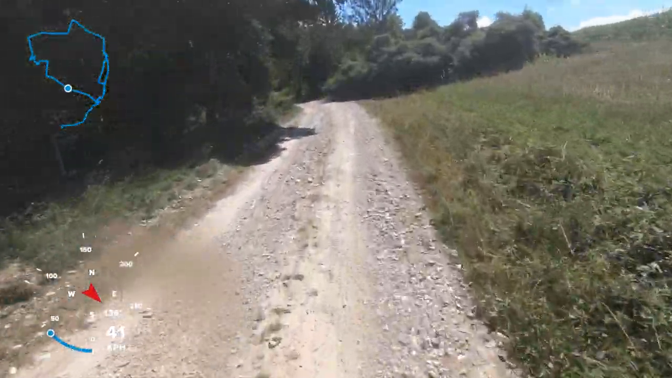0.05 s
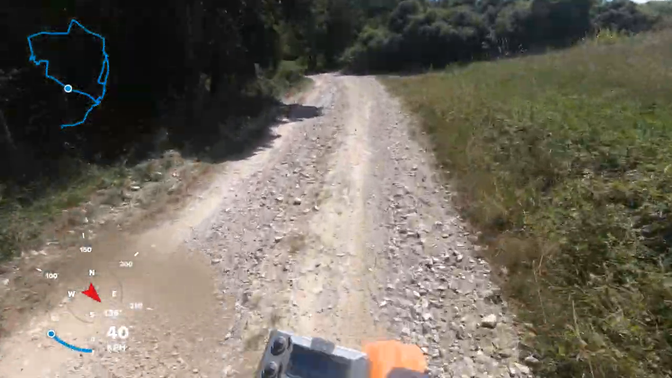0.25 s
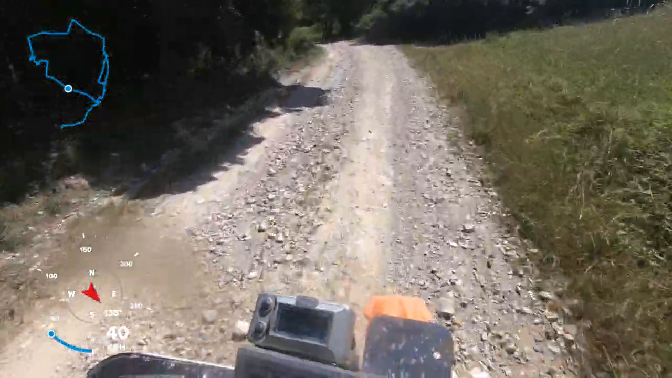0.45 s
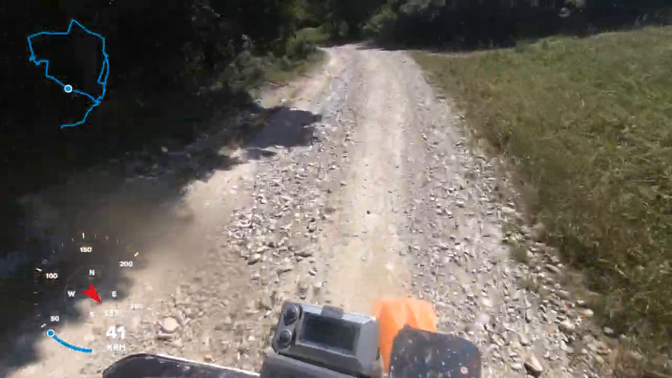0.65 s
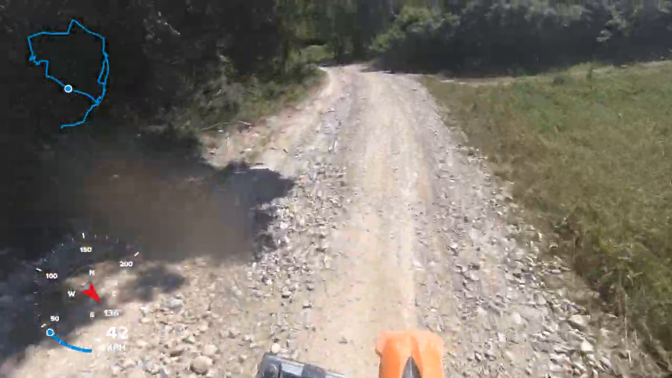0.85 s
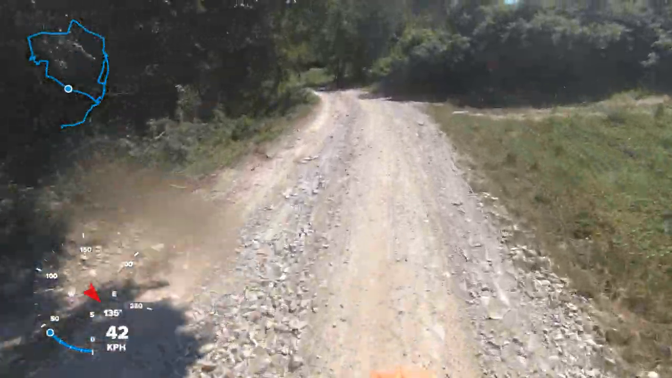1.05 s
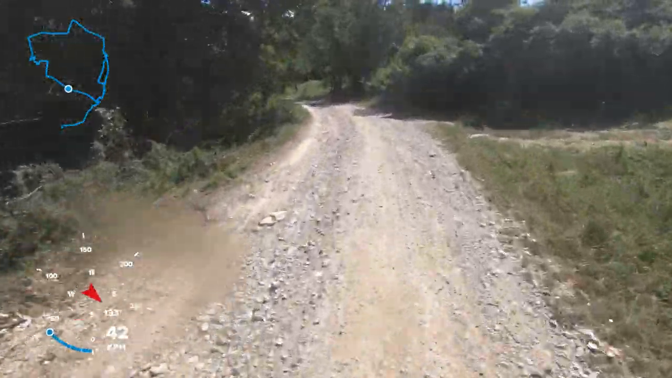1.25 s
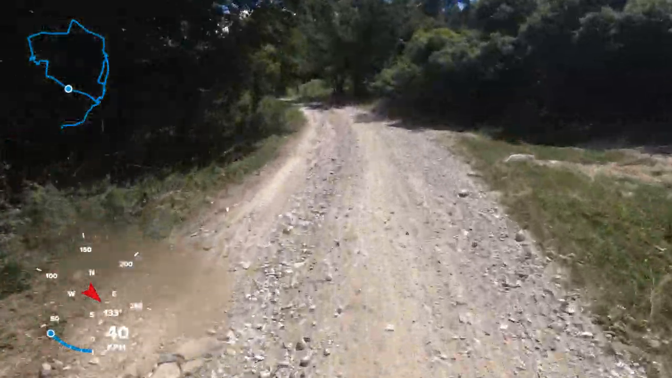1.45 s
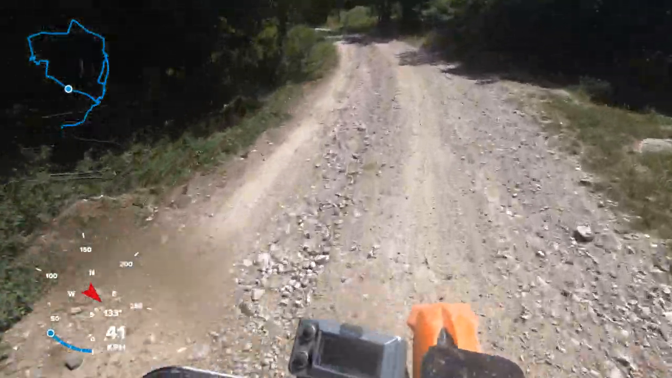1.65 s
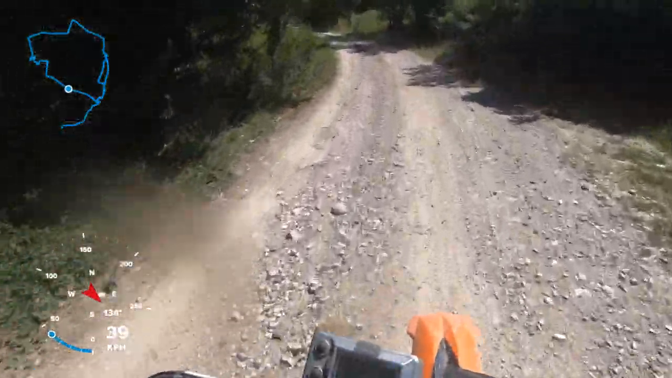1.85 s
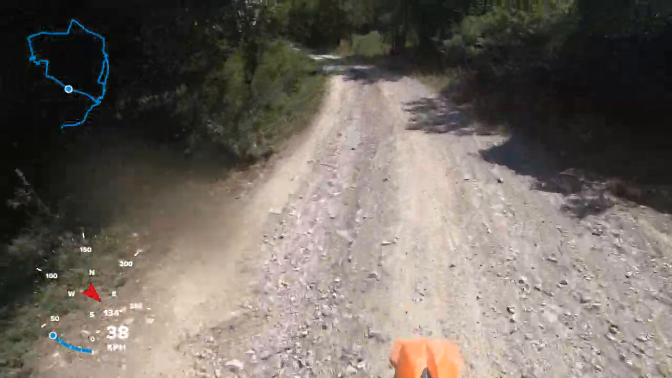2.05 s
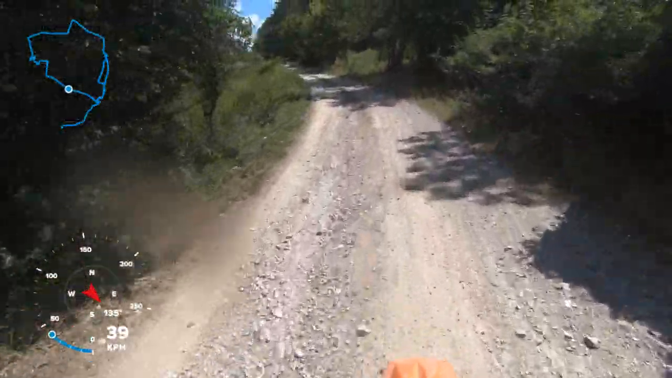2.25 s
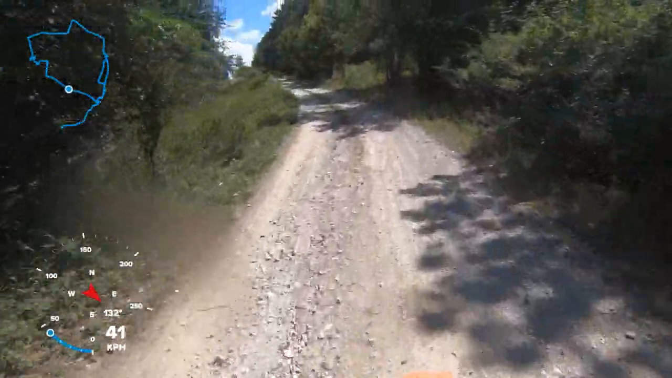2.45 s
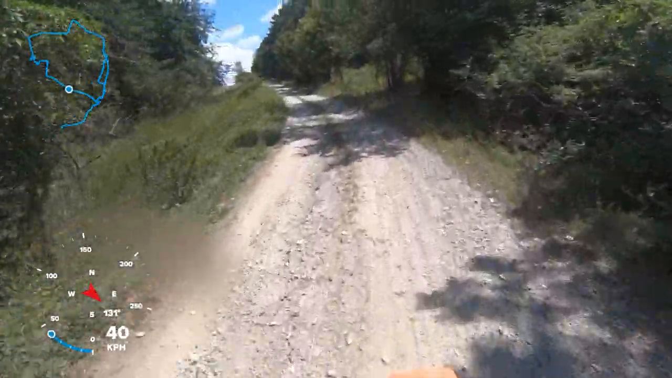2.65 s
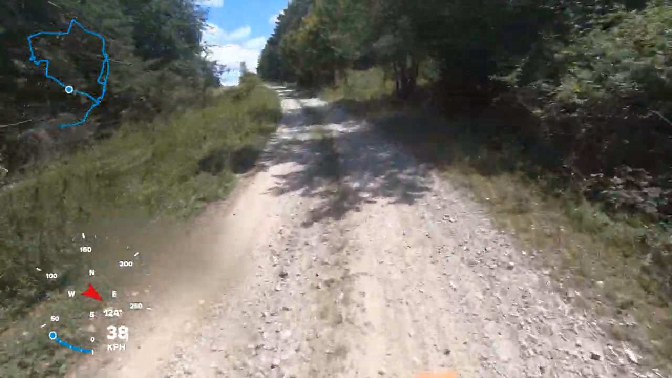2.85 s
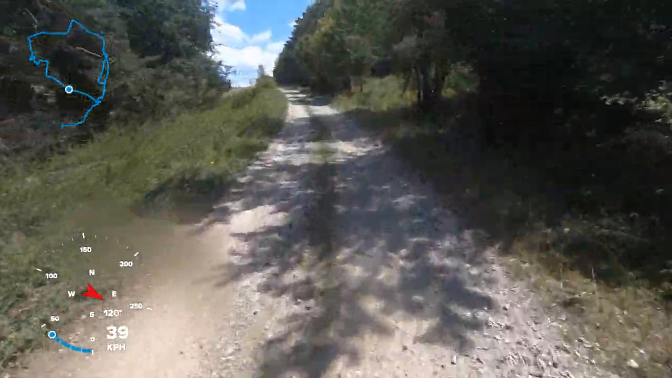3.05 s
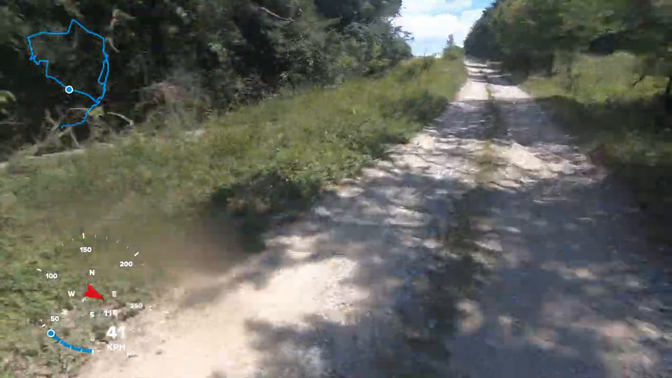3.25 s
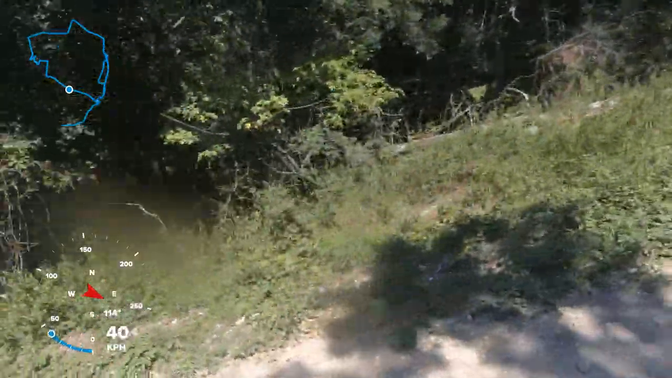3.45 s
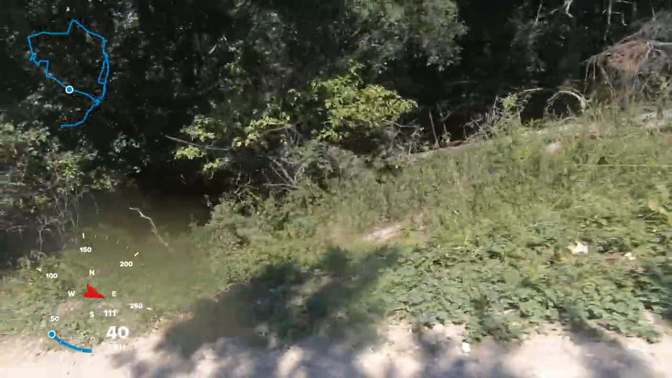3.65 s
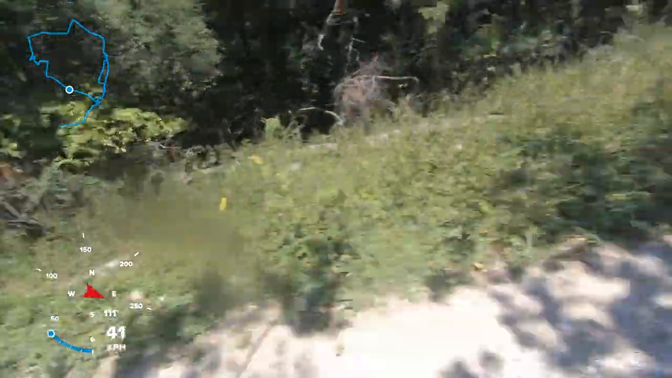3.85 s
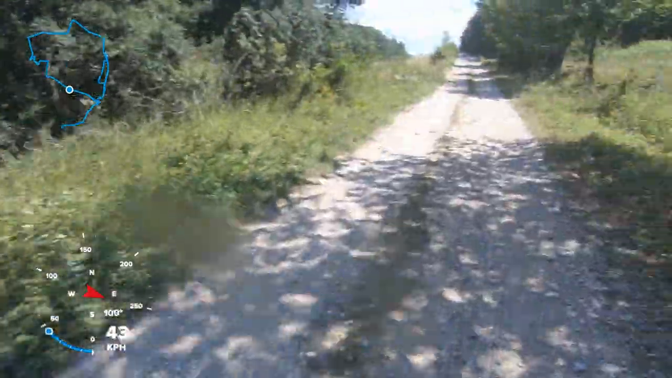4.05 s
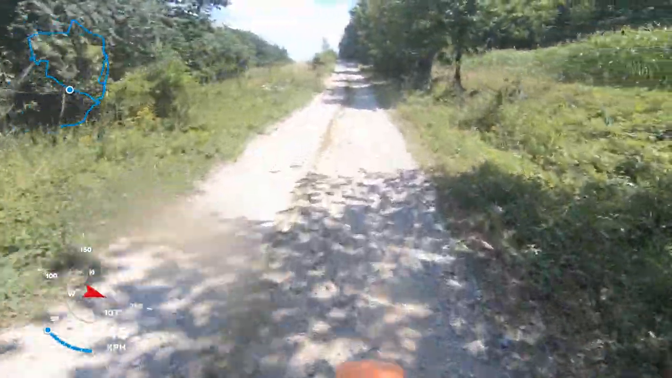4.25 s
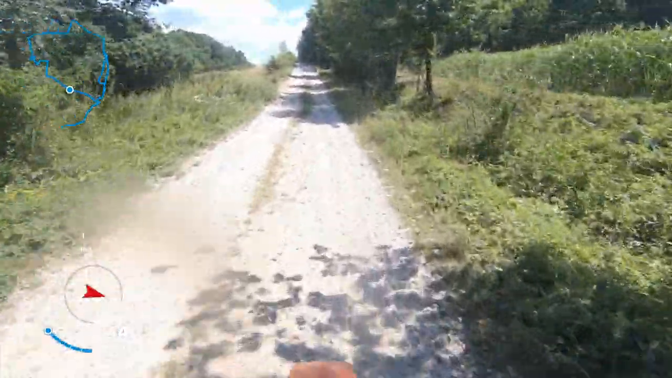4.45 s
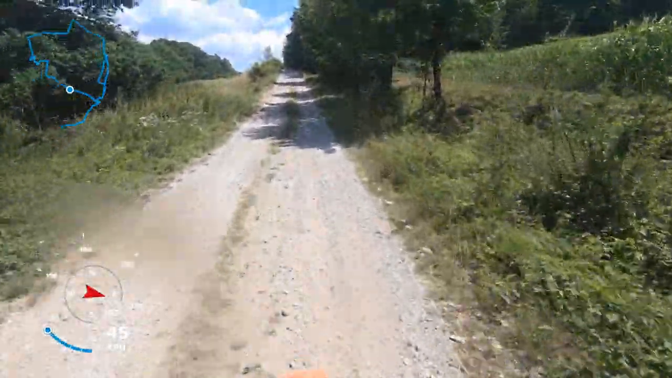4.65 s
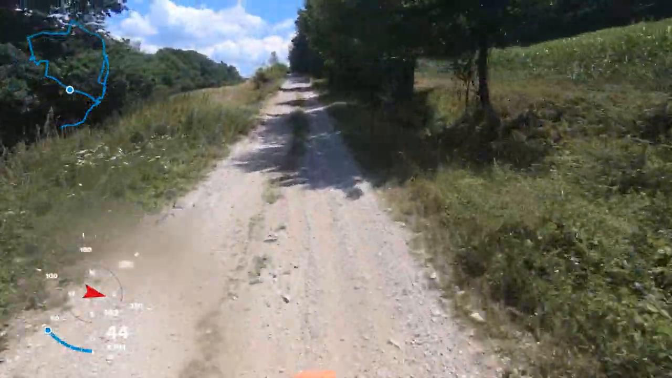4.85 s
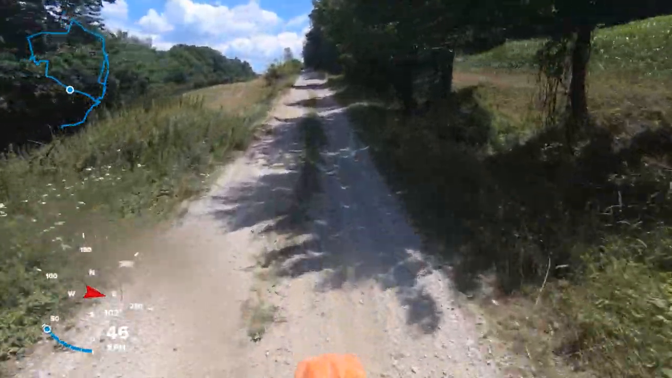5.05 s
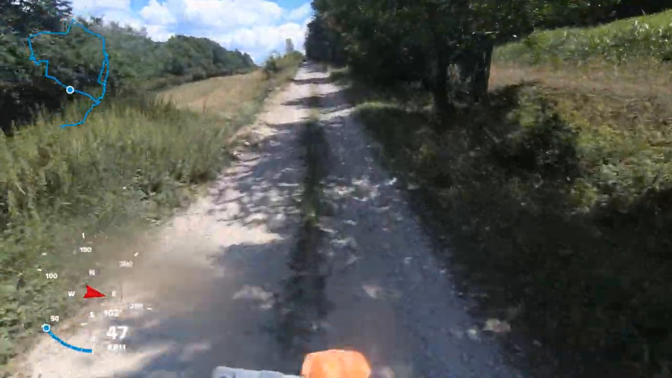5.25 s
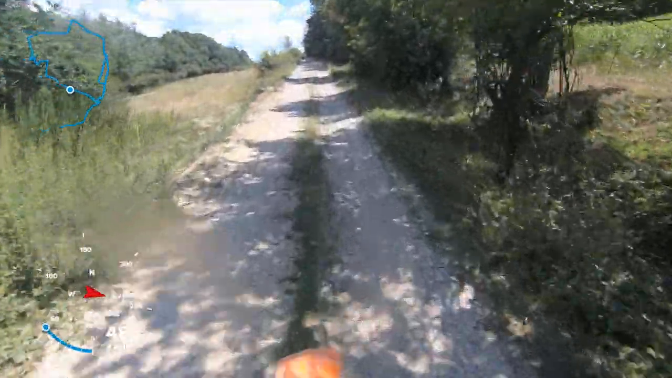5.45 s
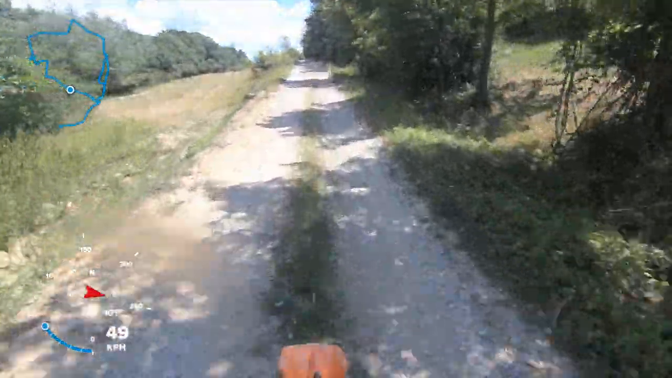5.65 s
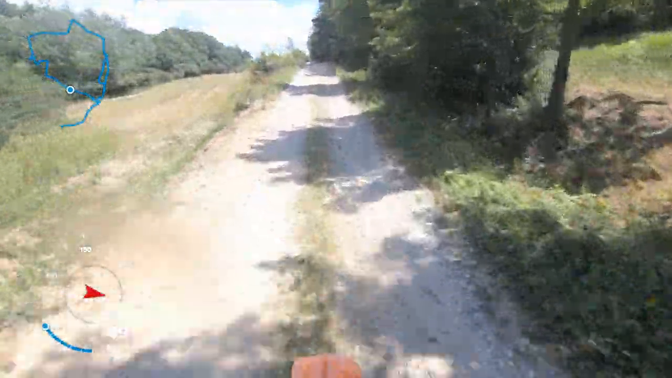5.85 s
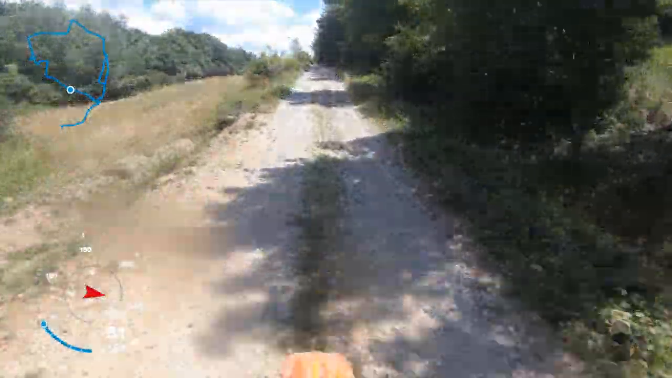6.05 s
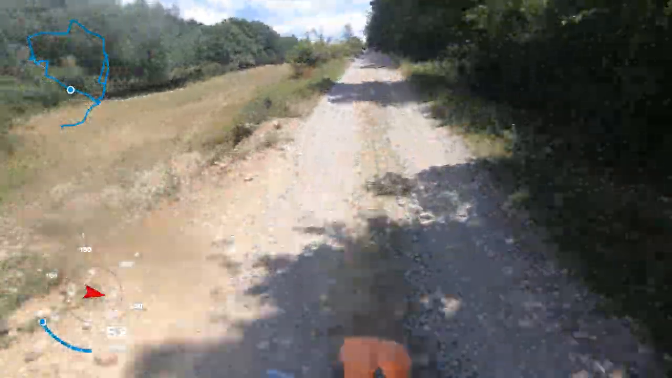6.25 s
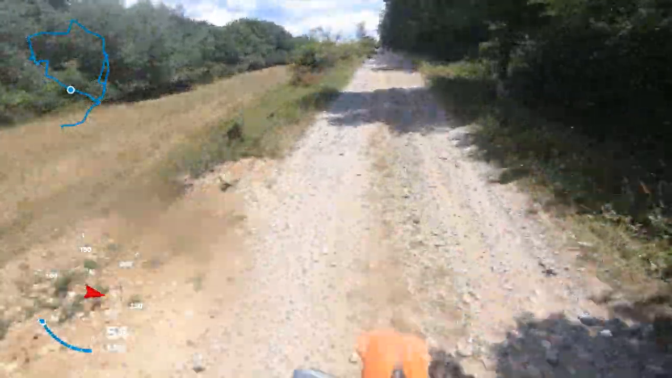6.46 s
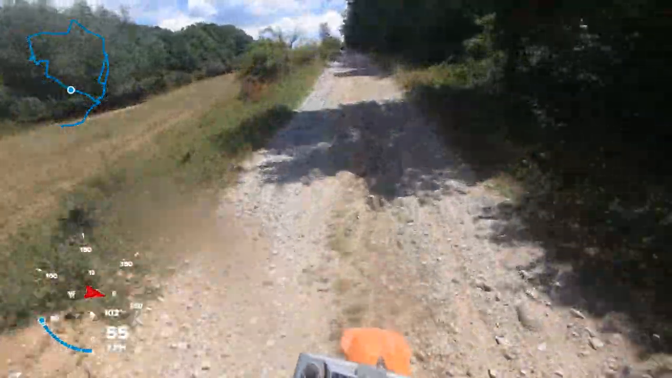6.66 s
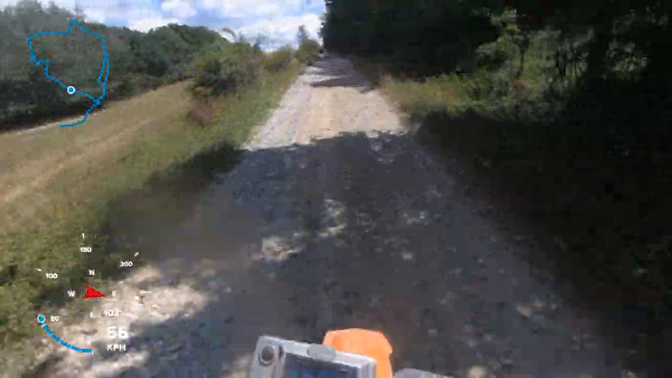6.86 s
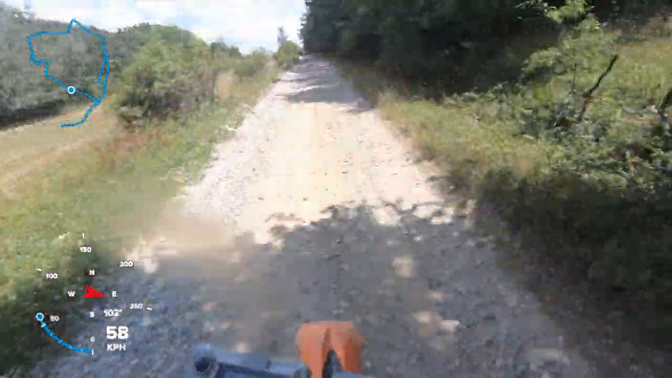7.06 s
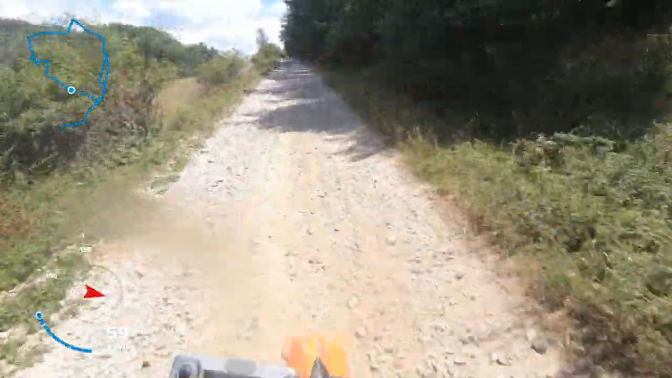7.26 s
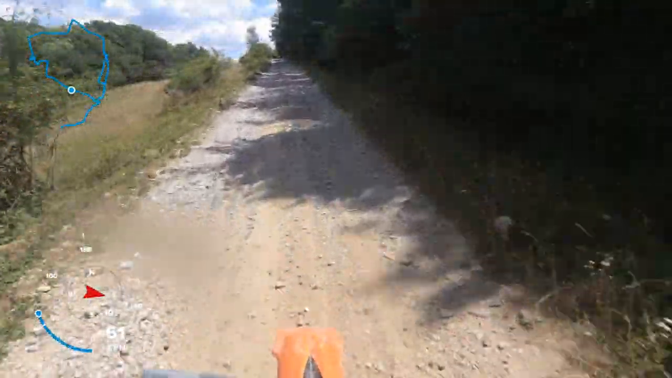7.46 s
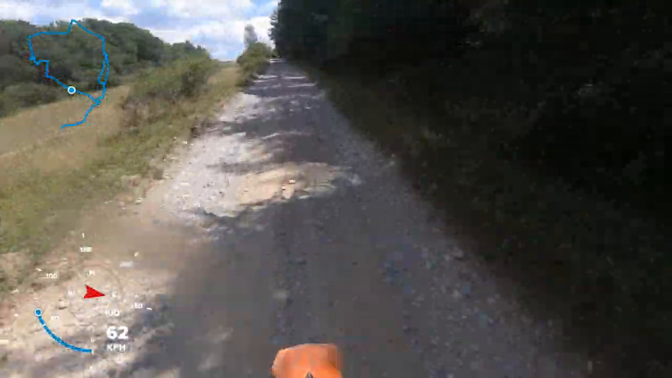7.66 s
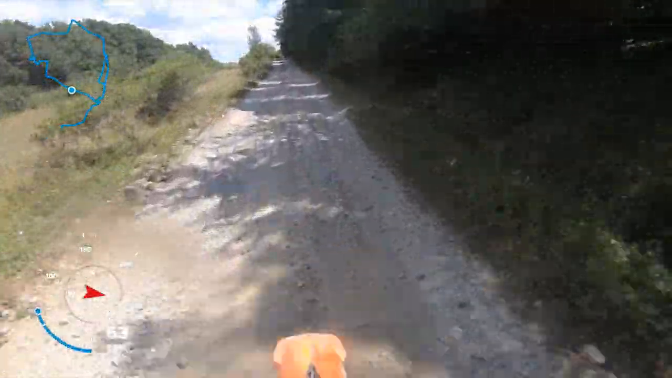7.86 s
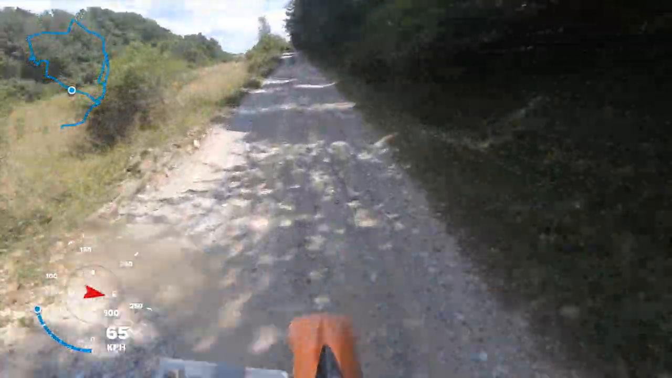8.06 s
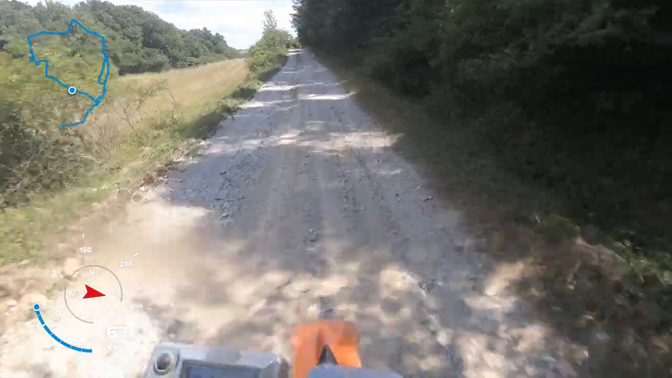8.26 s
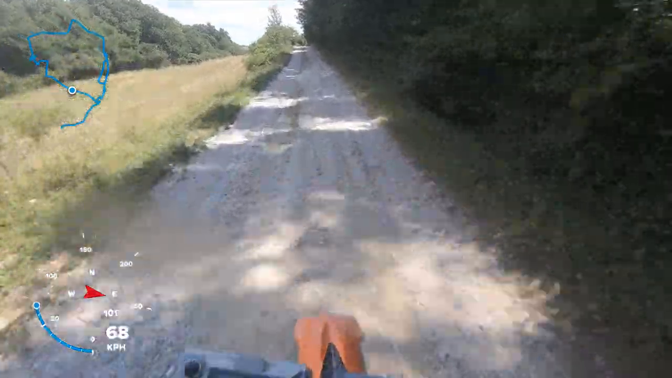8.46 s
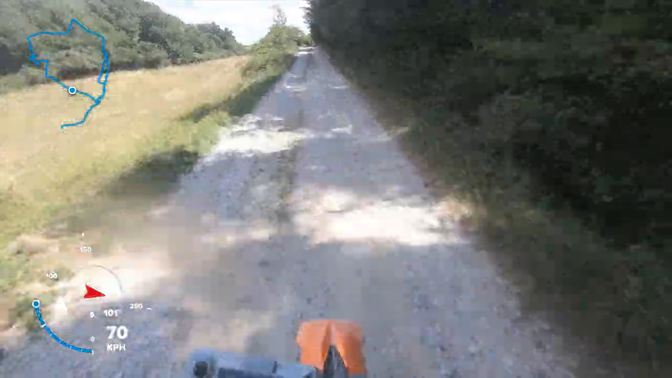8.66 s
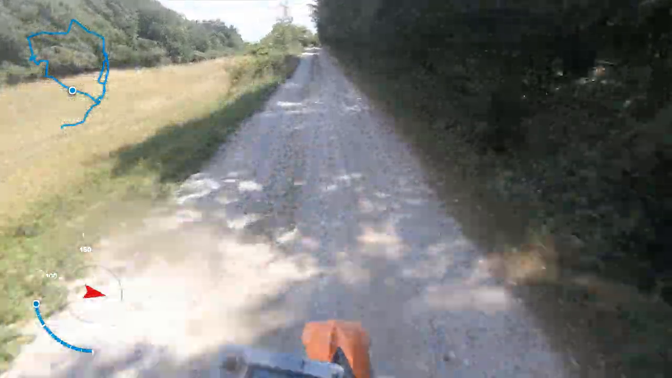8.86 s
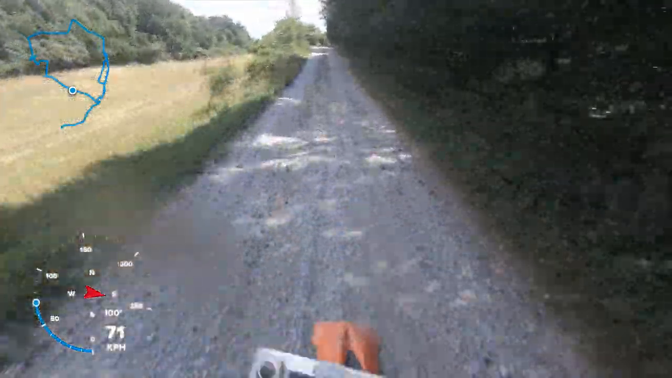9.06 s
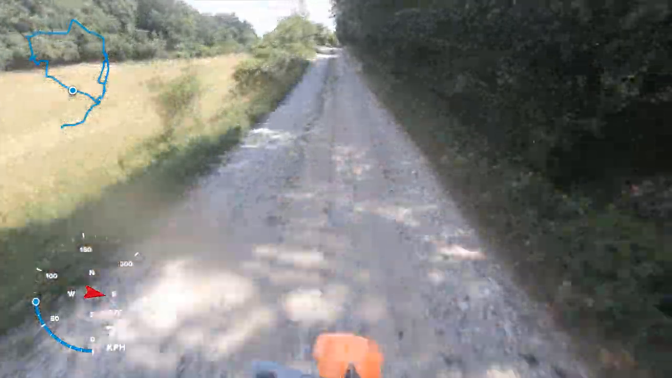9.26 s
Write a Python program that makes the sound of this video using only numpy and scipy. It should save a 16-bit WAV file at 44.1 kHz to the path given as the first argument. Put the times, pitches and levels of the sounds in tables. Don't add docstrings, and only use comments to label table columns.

```python
import sys
import numpy as np
from scipy import signal
from scipy.fft import rfft, irfft, next_fast_len
from scipy.io import wavfile

SR = 44100
rng = np.random.default_rng(int(sys.argv[2]) if len(sys.argv) > 2 else 0)


def linear_from_db(decibels):
    return 10 ** (np.asarray(decibels, float) / 20)


def wrap_up_sound(samples):
    columns = np.atleast_2d(samples).T
    tamed = np.clip(columns, -1, 1)
    steps = np.round(tamed * 32767).astype(np.int16)
    wavfile.write(sys.argv[1], SR, steps)


N = 410571
SIZE = next_fast_len(N + SR)
HZ = np.maximum(np.arange(SIZE // 2 + 1) * SR / SIZE, 1)
SWELL_EDGE_S, GUST_EDGE_S, ENGINE_EDGE_S = 0.06, 0.0091, 0.026


def rms_one(x):
    return x / np.sqrt(np.mean(x ** 2) + 1e-20)


def in_time(rows):
    s, *columns = np.transpose(rows)
    return [np.interp(np.arange(N) / SR, s, column) for column in columns]


def at_hz(points):
    hz, value = np.transpose(points)
    return np.interp(np.log(HZ), np.log(np.maximum(hz, 1)), value)


def response(points, hz):
    return np.interp(hz, *np.transpose(points))


def drift(rate):
    r = np.exp(-80 * np.pi * rate / SR)
    slow = signal.lfilter([1], [1, -2 * r, r * r], rng.standard_normal(N // 40 + 2002))[2000:]
    return np.interp(np.arange(N) / 40, np.arange(len(slow)), rms_one(slow))


def swell(start_s, length_s, edge_s):
    hold_s = max(length_s, 2 * edge_s)
    corners_s = [-edge_s, edge_s, hold_s - edge_s, hold_s + edge_s]
    return np.interp(np.arange(N) / SR - start_s, corners_s, [0, 1, 1, 0])


def changes(events, edge_s):
    return sum(amount * swell(start_s, length_s, edge_s) for start_s, length_s, amount in events)


def lowpass(x, order, hz):
    return signal.sosfilt(signal.butter(order, hz, fs=SR, output="sos"), x)


def resonate(x, hz, width_hz):
    r = np.exp(-np.pi * width_hz / SR)
    return signal.lfilter(np.array([1, 0, -1]) * (1 - r * r) / 2, [1, -2 * r * np.cos(2 * np.pi * hz / SR), r * r], x)


# pitch_hz, common_share
PORT_LIKENESS = [(40, 0.88), (120, 0.99), (250, 0.48), (500, 0.65), (1000, 0.41), (2000, 0.52),
                 (4000, 0.71), (8000, 0.18), (14000, .2)]


def noise(spectrum, patchy_db, rate):
    shared, left, right = rfft(rng.standard_normal((3, SIZE)))
    alike = np.clip(at_hz(PORT_LIKENESS), 0, 1)
    pair = linear_from_db(at_hz(spectrum)) * (np.sqrt(alike) * shared + np.sqrt(1 - alike) * np.array([left, right]))
    centres = np.arange(np.round(np.log2(spectrum[1][0])), np.log2(spectrum[-2][0]) + .5)
    octave = np.clip(np.log2(HZ), centres[0], centres[-1])
    out, together = 0, drift(rate)
    for centre in centres:
        band = np.clip(1 - np.abs(octave - centre), 0, 1)
        flicker = linear_from_db(patchy_db * (0.46 * together + 0.59 * drift(rate)))
        out = out + flicker * irfft(pair * band, SIZE)[:, :N]
    return rms_one(out)


# pitch_hz, left_minus_right_db
PORT_LEAN = [(60, -3), (100, -5), (170, -6), (300, -11.5), (500, -11.5), (860, -9.5), (1460, 0), (2490, 2),
             (4230, -3), (7210, 1.5)]
# pitch_hz, left_lead_radians
PORT_LEAD = [(0, 0), (340, .2), (600, 3.2), (1290, 2.7), (1500, 3.2), (1720, 6), (1980, 6.9), (2450, 5.9),
             (3270, 7.1), (3700, 7.1), (3960, 6.2), (4600, 7), (4910, 6.2), (5770, 7.9), (7410, 7.6)]


def ports(x):
    half = linear_from_db(at_hz(PORT_LEAN) / 2) * np.exp(.5j * at_hz(PORT_LEAD))
    return irfft(rfft(x, SIZE) * np.array([half, 1 / half]), SIZE)[:, :N]


# pitch_hz, level_db (per Hz)
WIND_RUMBLE = [(8.8, -27.5), (15, -11), (60, 0.5), (100, -2.5), (145, -7), (214, -11), (281, -13.5),
               (355, -15.5), (486, -15.5), (677, -23.5), (840, -32.5), (1320, -38.5), (1600, -44.5),
               (2080, -69), (3520, -120)]
# start_s, length_s, change_db
ROAR_SWELLS = [(0.265, 0.61, 2.5), (0.934, .16, 3), (1.489, 0.33, 3), (1.849, 0.3, 2), (2.7, 0.58, 0.5),
               (4.205, 0.81, -2), (5.202, 0.61, -1), (6.3, 0.59, 2), (7.4, 0.54, -1), (4.304, 0.22, 0.5),
               (8.204, .45, 0.5), (8.95, 0.33, 1.5)]


def wind(octaves, turned):
    thud_db = -27.5 + 4.5 * octaves + 0.5 * drift(1.9) + 6 * turned
    roar_db = -26 + 4 * octaves + 6 * turned + changes(ROAR_SWELLS, SWELL_EDGE_S)
    top_db = -7 * turned
    rumble = noise(WIND_RUMBLE, patchy_db=-0.5, rate=12.0)
    thud = signal.sosfiltfilt(signal.butter(2, 110, fs=SR, output="sos"), rumble)
    top = signal.sosfiltfilt(signal.butter(3, 680, "high", fs=SR, output="sos"), rumble)
    return linear_from_db(thud_db + 0.5) * thud + linear_from_db(roar_db + 2.0) * (rumble - thud + (linear_from_db(top_db) - 1) * top)


# pitch_hz, level_db (per Hz)
GUST_COLOUR = [(150, -29.5), (280, -1.5), (400, -1.5), (520, -3), (700, -5.5), (1000, -6.5), (1250, -10),
               (1600, -17), (2500, -26), (4000, -42), (16000, -138)]
# start_s, length_s, level_db (over the steady rustle)
GUSTS = [(.09, .03, 3), (0.158, 0.054, 14), (.42, 0.26, 0), (.88, .025, 9.5), (0.929, .15, 23),
         (2.022, .05, 17), (2.385, 0.037, 17.5), (2.626, .03, 20.5), (7.079, .1, 19), (6.97, .08, 18),
         (1.123, 0.035, 20), (1.23, 0.021, 20), (1.267, .035, 27), (1.31, .065, 14.5), (1.443, 0.033, 14.5),
         (1.552, 0.067, 6.5), (1.707, .13, 2.5), (1.88, 0.24, 14), (2.107, 0.12, 10.5), (2.248, 0.032, 16),
         (2.307, .13, 10), (2.496, .04, 15), (2.574, 0.092, 14), (2.867, .03, 5.5), (2.993, 0.032, 16),
         (3.093, 0.13, 18.5), (3.25, 0.28, 14), (3.561, 0.092, 14.5), (3.76, 0.06, 3), (3.86, 0.091, 10.5),
         (3.958, .09, 15), (4.078, 0.076, 13.5), (4.698, 0.33, 5), (5.029, .04, 8), (5.145, 0.028, 9.5),
         (5.591, 0.037, 4), (6.15, 0.12, 4.5), (6.86, 0.029, 6.5), (6.959, .3, 17), (7.3, .15, 7),
         (7.794, 0.13, 9.5), (8.257, 0.067, 8.5), (8.548, 0.043, 4.5), (8.71, 0.044, 4.5), (8.86, 0.03, 6),
         (9.202, .08, 3)]
# pitch_hz, level_db
GUST_LEAK = [(200, -19.5), (400, -9), (600, 1), (800, -0.5), (1200, -2), (3000, -6)]


def gusts(octaves):
    rise_db = np.max([db * swell(s, length, GUST_EDGE_S) for s, length, db in GUSTS], axis=0)
    rustle_db = -57.5 + 12.5 * octaves + rise_db
    gust_db = -48.5 + 0.52 * (rustle_db + 48.5)
    grain = linear_from_db(2.0 * np.clip(drift(40), -2, 2))
    air = noise(GUST_COLOUR, patchy_db=1.4, rate=52.0)
    dull = signal.sosfiltfilt(signal.butter(1, 750, fs=SR, output="sos"), air)
    crisp = linear_from_db(0.19 * (rustle_db + 33.5)) * (air - dull)
    left, other = linear_from_db(gust_db + 10.5) * grain * (dull + crisp)
    leak = .8 * left + (1 - .8) * other
    right = irfft(rfft(leak, SIZE) * linear_from_db(at_hz(GUST_LEAK)) * np.exp(2.4j), SIZE)[:N]
    return np.array([left, right])


# start_s, length_s, level_db
LUMPS = [
    (1.698, .12, -42),
    (1.878, 0.16, -39.5),
    (2.382, 0.08, -34),
    (3.094, 0.11, -32),
    (3.36, 0.23, -37),
    (3.554, .06, -37),
    (3.85, 0.17, -37.5),
    (4.07, 0.098, -30.5),
    (6.972, 0.17, -44),
    (8.26, 0.046, -47),
]
LUMP_BAND = [160, 487]   # low_hz, high_hz


def lumps():
    band = signal.butter(2, LUMP_BAND, "band", fs=SR, output="sos")
    low = signal.sosfilt(band, rng.standard_normal(N))
    gain = sum(linear_from_db(db) * swell(s, length, 2 * GUST_EDGE_S) for s, length, db in LUMPS)
    return gain * linear_from_db(2.5 * drift(30)) * rms_one(low) * [[1], [0]]


# time_s, pitch_hz, level_db
REV_TONE = [
    (0, 1102, -72.5),
    (7.2, 1100, -66),
    (7.5, 1140, -51),
    (7.75, 1180, -48),
    (8.1, 1267, -55),
    (8.55, 1343, -54),
    (9, 1360, -55),
    (9.31, 1424, -54),
]


def rev_tone():
    hz, level_db = in_time(REV_TONE)
    wide = lowpass(rng.standard_normal((2, N)), 2, 45)
    carrier = np.exp(2j * np.pi * np.cumsum(hz) / SR)
    return linear_from_db(level_db) * rms_one(((wide[0] + 1j * wide[1]) * carrier).real)


# pitch_hz, level_db (per Hz)
AIR_COLOUR = [(6500, -43.5), (8000, 2), (9000, -4), (10000, -4.5), (12000, -14.5), (14000, -17.5),
              (15700, -19), (17000, -65.5)]
# start_s, length_s, change_db
AIR_SWELLS = [(0, .7, 2.5), (.7, 0.35, 4.5), (4.0, 0.36, -5), (5.55, 0.63, 2), (6.3, 0.59, 1),
              (7.102, 1.2, -3.5), (8.6, 0.37, 0.5)]


def air_hiss(octaves, clatter_db, puff):
    air_db = -84 + 1.5 * (clatter_db - clatter_db.mean()) + 7 * octaves + changes(AIR_SWELLS, SWELL_EDGE_S)
    return linear_from_db(air_db + 5.5) * noise(AIR_COLOUR, patchy_db=1.5, rate=12.0) * (1 + 0.16 * puff)


# time_s, peak_db
STONES = [
    (0.5112, -53),
    (0.975, -56),
    (2.7916, -64),
    (3.231, -53),
    (3.8122, -71),
    (5.9497, -53),
    (6.7007, -47),
    (7.787, -58),
    (8.868, -62),
]


def stones():
    patter_db = -72 + 2.5 * np.minimum(rng.exponential(1, N), 3)
    clicks = (rng.random(N) < 3 / SR) * linear_from_db(patter_db) * rng.choice([-1, 1], N)
    for s, db in STONES:
        clicks[round(s * SR)] = linear_from_db(db + 10.5)
    sides = clicks * rng.uniform(.3, 1.3, (2, N))
    return signal.sosfilt(signal.butter(2, [4000, 14000], "band", fs=SR, output="sos"), sides + 1e-18)


# pitch_hz, level_db (per Hz)
CLATTER_COLOUR = [(760, -25), (1300, -12.5), (1420, -0.5), (1690, -2), (1870, -3), (2250, -3.5),
                  (2440, -7.5), (2690, -3), (3360, -8.5), (3960, -11), (4620, -14.5), (5400, -9.5),
                  (6130, -7), (7000, -16), (7750, -19), (8100, -26), (9960, -38), (16900, -120)]
# time_s, level_db (over the mechanical noise)
SNAPS = [(1.853, 5.5), (2.05, 4.5), (3.375, 2), (3.41, 6), (3.445, 4), (3.62, 7), (3.882, 3), (3.95, 3),
         (3.98, 5), (4.307, 1), (5.02, 4.5), (5.633, 2.5), (6.678, 4), (7.782, 5)]


def clatter(clatter_db, puff):
    snap_s = .008
    snap_db = sum(db * swell(s, snap_s, snap_s / 2) for s, db in SNAPS)
    hiss = noise(CLATTER_COLOUR, patchy_db=1.5, rate=22.0)
    return linear_from_db(clatter_db + snap_db + 7.0) * hiss * (1 + 0.22 * puff)


GEAR_TEETH = [69.4, 72.2]
# pitch_hz, level_db (over the mechanical noise)
GEARCASE = [(1800, 3), (2100, 1.5), (2400, -1), (2700, 2.5), (2950, 4.5), (3200, -2), (3500, -2.5),
            (3800, -13.5)]
# start_s, length_s, change_db
FLARES = [(0, 0.2, 0.5), (.3, 0.36, 1), (2.699, 0.14, -2), (2.788, .05, 4), (3.44, 0.27, 5.5),
          (3.78, 0.092, 3), (7.3, 0.24, -1.5), (3.9, 0.32, 5), (1.098, 0.93, 1.5), (5.243, 0.085, 3.5),
          (5.403, 0.58, 0), (7.05, 0.35, 0.5), (5.91, 0.36, 4), (6.547, 0.22, 3), (6.803, 0.22, 1.5),
          (7.765, 0.2, 4.5)]
# start_s, length_s, low_pitch_factor, high_pitch_factor, low_share, high_share
SLACKS = [
    (0, 0.31, 0.98, 0.98, 0.97, 0.97),
    (0.379, .45, 1.0, .975, 1.1, 0.52),
    (1.851, 0.45, 1.01, 1.0, 0.79, .5),
    (2.296, 0.45, .95, 1.01, 0.84, .8),
    (2.78, 0.069, 1.0, 1.03, .5, 1.2),
    (3.302, .4, 1.02, 0.97, 0.92, .4),
    (4.561, 0.55, 0.94, 1.03, 1.1, 0.84),
    (5.298, 0.76, 1.01, 1.005, 0.64, 0.88),
    (7.42, .08, 1, 0.9, 0.59, .8),
    (7.768, .17, .91, .97, 1.0, 1.07),
]


def whine(cycle_hz, throttle, puff, clatter_db):
    level_db = clatter_db + changes(FLARES, ENGINE_EDGE_S) + response(GEARCASE, GEAR_TEETH[-1] * cycle_hz)
    idler_teeth, idler_share = 58.5, 0.19
    pitch, share = [1, 1, 1], [1 - 0.38 * throttle, 0.11 + 0.79 * throttle, idler_share]
    for s, length, *slack_values in SLACKS:
        slack = swell(s, length, ENGINE_EDGE_S)
        for k in range(2):
            pitch[k] = pitch[k] + slack * (slack_values[k] - 1)
            share[k] = share[k] + slack * (slack_values[2 + k] - share[k])
    out = 0
    for k, teeth in enumerate([*GEAR_TEETH, idler_teeth]):
        wide = lowpass(rng.standard_normal((2, N)), 2, 95)
        blur = .95 + rms_one(wide[0]) + 1j * rms_one(wide[1])
        turns = np.cumsum(teeth * cycle_hz * pitch[k]) / SR
        out = out + share[k] * (blur * np.exp(2j * np.pi * turns)).real
    return linear_from_db(level_db - 2.5) * out * (1 + 0.36 * puff)


# pitch_hz, level_db
FRAME_SHAKE = [(52, -29), (58, -28), (69, -23.5), (76, -26.5), (86, -26.5), (99, -23.5), (108, -26.5),
               (120, -28)]


def throb(cycles, cycle_hz, turn_db):
    level_db = response(FRAME_SHAKE, 2 * cycle_hz) + turn_db
    return np.sqrt(2) * linear_from_db(level_db + 0.21 * drift(16)) * np.sin(4 * np.pi * cycles + 0.27 * drift(4.3))


SECOND_FIRING = 285 / 720


def firings(cycles, uneven_db, rear_db):
    clicks, chance = np.zeros(N), rng.standard_normal((int(cycles[-1]) + 2, 2))
    for k, (offset, level_db) in enumerate([(0, 0), (SECOND_FIRING, rear_db)]):
        count = np.floor(cycles - offset).astype(int)
        at = np.flatnonzero(np.diff(count)) + 1
        clicks[at] = linear_from_db(level_db + uneven_db * chance[count[at] + 1, k])
    return clicks


# pitch_hz, width_hz, level_db
PIPE_MODES = [
    (500, 276, -2),
    (672, 57, 5),
    (940, 360, -13),
    (1180, 190, -5),
]


def rasp(clicks, octaves):
    tone = 0
    for k, (hz, width_hz, db) in enumerate(PIPE_MODES):
        softened = resonate(clicks + 1e-18, hz, 2.6 * width_hz)
        tone = tone + (-1) ** k * linear_from_db(db) * resonate(softened, hz, width_hz)
    return linear_from_db(-47.5 + 4 * octaves) * rms_one(tone)


# cycle_rate_multiple,
# cruising_db, pulling_db, rise_db (per octave)
NOTE = [(1.004, -6.5, -5, 5.5), (2.999, -12, -12.5, -2), (4.005, -13, -17.5, 8), (4.998, -4.5, -4.5, -4.5),
        (6, -5, -15.5, 6), (7.013, -15.5, -5.5, 4), (8, -7, 0.5, -0.5), (9, -24.5, -10.5, 2),
        (10, -1, -11, 0.5), (11, -3.5, -12.5, -4.5), (11.96, -12.5, -29.5, 1), (13, -19, -11.5, 5.5),
        (14.13, -19, -24, 4.5), (14.9, -22.5, -20.5, 3), (16.05, -12, -21, -8.5), (18, -23, -24.5, 4),
        (20.1, -22.5, -21, 5), (22.2, -24.5, -26, 7.5),
        (17, -26, -22.5, 6.4), (19, -26.5, -20.5, 7), (21, -30.5, -27, 7), (23, -30.5, -28.5, 6.2),
              (24, -28, -29.5, 8), (25, -30, -30, 8), (26, -30, -30, 8), (27, -29, -28.5, 8)]
# pitch_hz, passed_db
SILENCER = [(30, -3), (120, 7.5), (185, 1), (230, -0.5), (280, 1.5), (335, -5), (385, -15), (450, -4.5),
            (520, -4.5), (580, -12.5), (650, -2), (740, -7), (900, -14), (1200, -10.5), (1600, -13.5)]


def exhaust(cycles, cycle_hz, octaves, throttle, level_db):
    out = 0
    for multiple, cruise_db, pull_db, slope_db in NOTE:
        k = round(multiple)
        load_db = (1 - throttle) * cruise_db + throttle * pull_db
        order_db = load_db + slope_db * octaves + response(SILENCER, k * cycle_hz)
        gain = linear_from_db(level_db + order_db + 0.39 * drift(2.7))
        out = out + gain * np.sin(2 * np.pi * k * (cycles - 0.291 * SECOND_FIRING) + 0.33 * drift(4.3))
    return np.sqrt(2) * out


# time_s, cycle_rate_hz
ENGINE = [(0, 28.64), (.6, 29.85), (1.1, 26.81), (1.8, 26.03), (2.5, 27.54), (3.73, 27.25), (3.99, 30.48),
          (4.27, 30.13), (4.68, 34.5), (5.16, 34.32), (5.3, 36.76), (6.01, 36.68), (6.5, 40.56),
          (7.42, 43.15), (7.69, 49.55), (7.95, 49.96), (8.7, 54.36), (9.31, 60.1)]
# start_s, length_s, cycle_rate_change_hz
REV_SURGES = [(0.21, 0.0698, -0.56), (2.545, 0.24, 1), (4.65, 0.119, .5), (4.85, 0.13, 1.45),
              (5.266, 0.1414, 0.67), (6.503, 0.2503, .5), (6.785, .12, -1.5), (4.99, .1, -0.47),
              (5.44, 0.1192, -.5), (6.98, .1, .3), (2.9, 0.3046, -0.24), (9.03, .1, -.5),
              (7.259, 0.141, 0.95), (7.8, .1, -0.9), (7.03, .2, -0.54), (7.996, 0.42, 2.0),
              (8.42, .15, 1.0), (8.794, 0.25, 2.5)]


def engine_speed():
    return in_time(ENGINE)[0] + changes(REV_SURGES, ENGINE_EDGE_S)


# time_s, throttle_0_to_1, exhaust_db, mechanical_noise_db
LOAD = [(0, 0.47, -28, -56.5), (.34, 0, -32, -55.5), (.97, 0.49, -32, -58), (1.1, 0.2, -33.5, -60.5),
        (2.8, 0.09, -30, -57), (3.15, 0.04, -35, -59.5), (3.78, 0.8, -28.5, -59.5), (3.95, 0.6, -31, -58),
        (4.4, 1, -29, -54.5), (5.1, 0.73, -28.5, -55), (5.75, 0.67, -28.5, -54), (6.3, 0.78, -30, -54),
        (7.4, 0.6, -29, -51.5), (7.55, 0.5, -30, -55), (7.85, 0.42, -27, -52.5), (8.3, 0.94, -32.5, -54),
        (8.6, 1, -32, -56.5), (9.31, 0.9, -35.5, -55.5)]


def engine_load():
    throttle, note_db, clatter_db = in_time(LOAD)
    return np.clip(throttle, 0, 1), note_db, clatter_db


def scene():
    cycle_hz = engine_speed()
    cycles = np.cumsum(cycle_hz) / SR
    octaves = np.log2(cycle_hz / 28)
    throttle, note_db, clatter_db = engine_load()
    turned = swell(3.47, 0.4, 0.067)
    turn_db = -10 * turned
    clatter_db = clatter_db - 2.5 * turned
    clicks = firings(cycles, uneven_db=1.5, rear_db=-9.0)
    decay = np.exp(-1 / (0.0089 * SR))
    puff = rms_one(signal.lfilter([1], [1, -decay], clicks))
    engine = exhaust(cycles, cycle_hz, octaves, throttle, note_db + turn_db)
    engine = engine + rasp(clicks, octaves) + throb(cycles, cycle_hz, turn_db)
    engine = engine + whine(cycle_hz, throttle, puff, clatter_db)
    heard = wind(octaves, turned) + rev_tone() + air_hiss(octaves, clatter_db, puff)
    heard = heard + stones() + clatter(clatter_db, puff) + engine
    return ports(heard) + gusts(octaves) + lumps()


def gain_control(x):
    loudness = np.mean(x ** 2, axis=0)
    power = signal.lfilter([.001], [1, .001 - 1], loudness, zi=[np.mean(x ** 2)])[0] + 1e-5
    held = x * (power / linear_from_db(-43.0)) ** -.24
    return .42 * np.tanh(held / .42)


def sample_jumps(x):
    frame_s, first_jump_s = 1001 / 60000, .0122
    frame = np.floor((np.arange(N) / SR - first_jump_s) / frame_s)
    at = np.arange(N) + (frame % 5 == 0)
    return np.array([np.interp(at, np.arange(N), channel) for channel in x])


def roll_off(x):
    return signal.sosfilt(signal.butter(12, 15720, fs=SR, output="sos"), x)


def record(dry):
    return roll_off(sample_jumps(gain_control(dry)))


dry = scene()
out = record(dry)
wrap_up_sound(out)
```